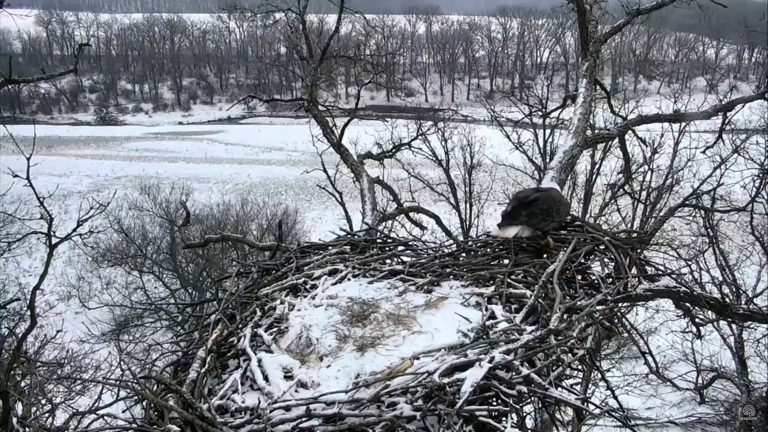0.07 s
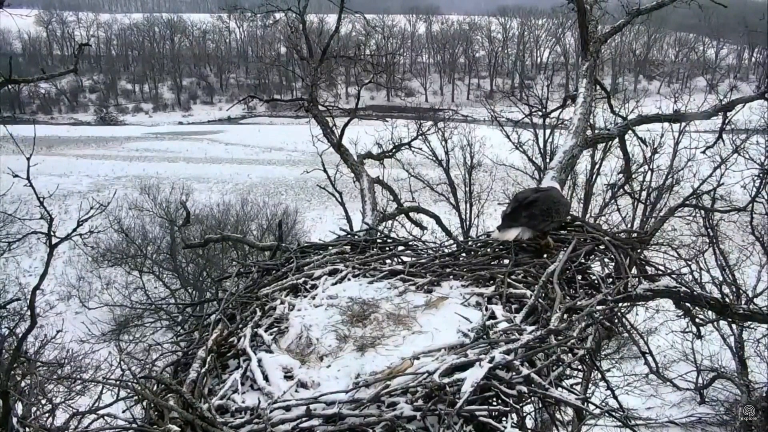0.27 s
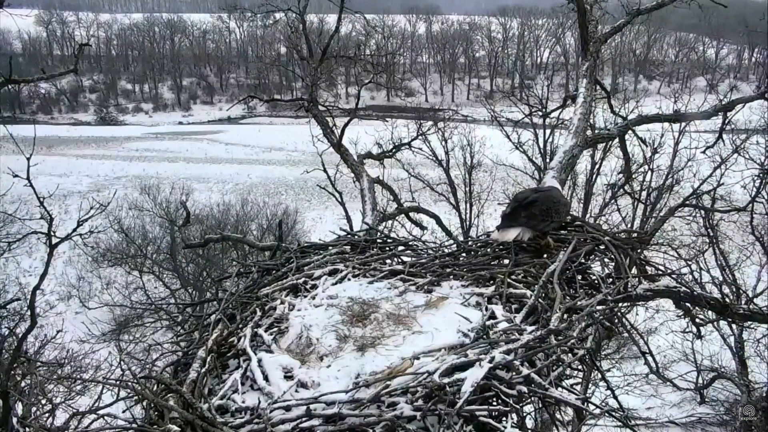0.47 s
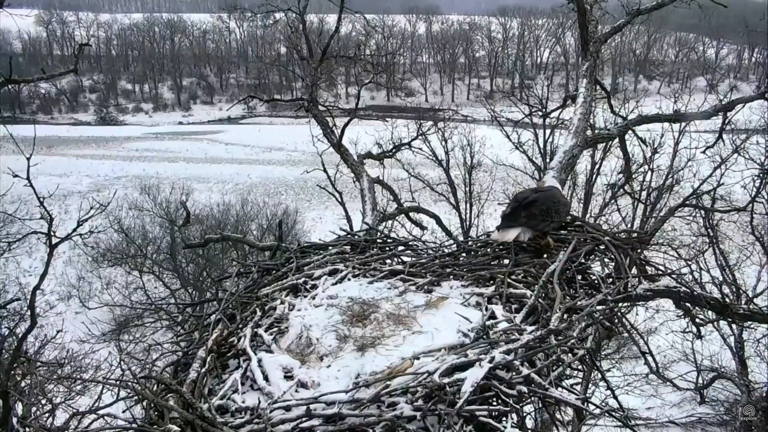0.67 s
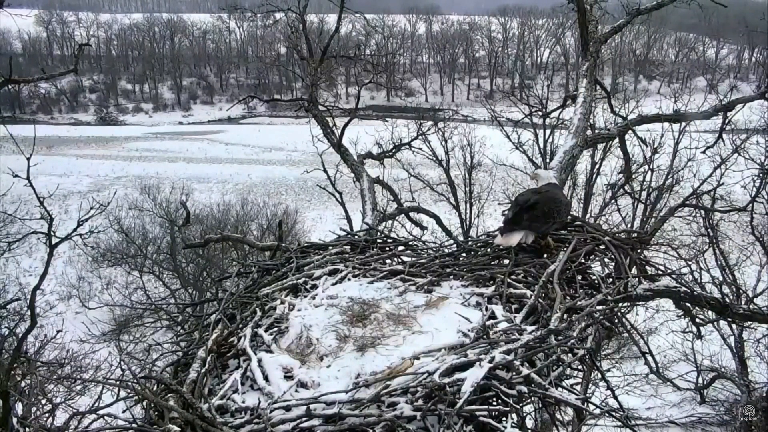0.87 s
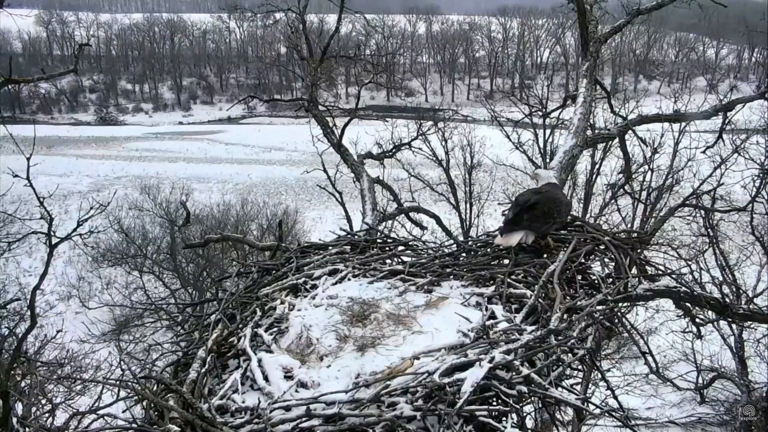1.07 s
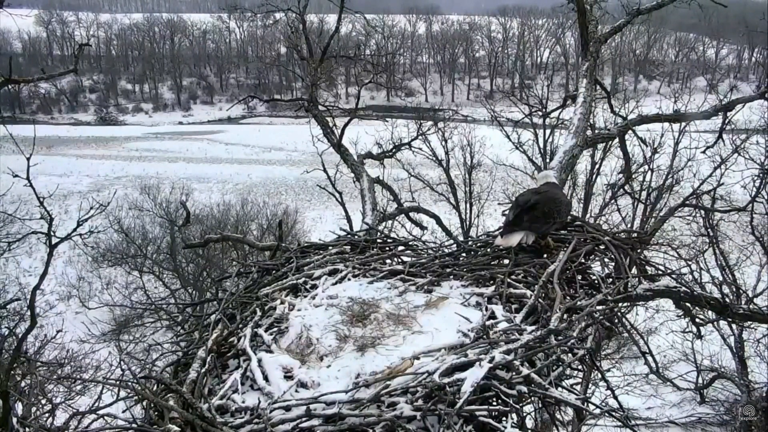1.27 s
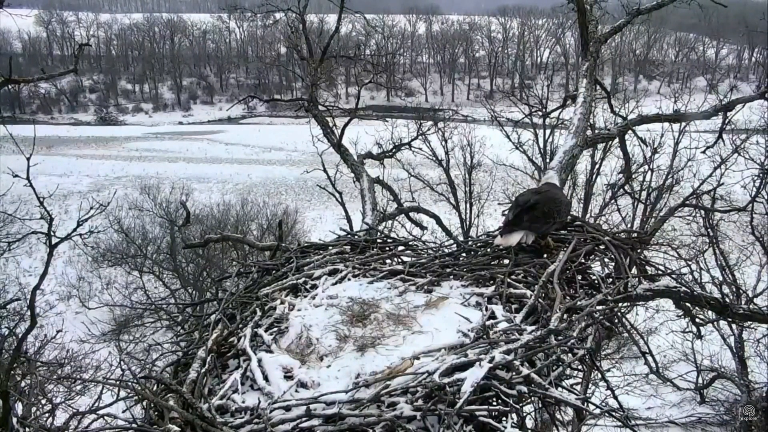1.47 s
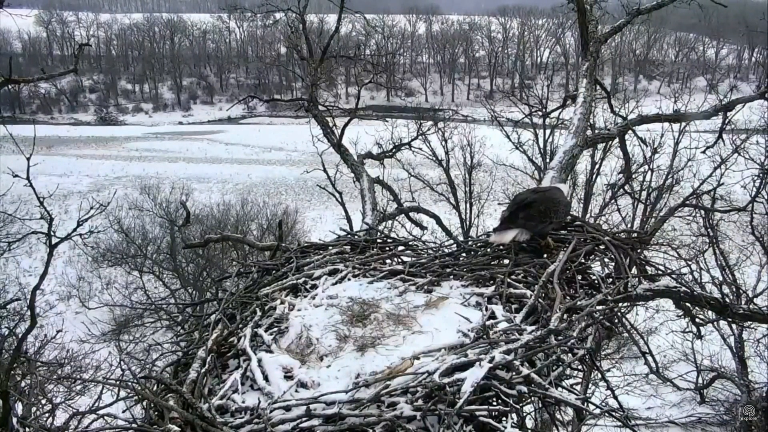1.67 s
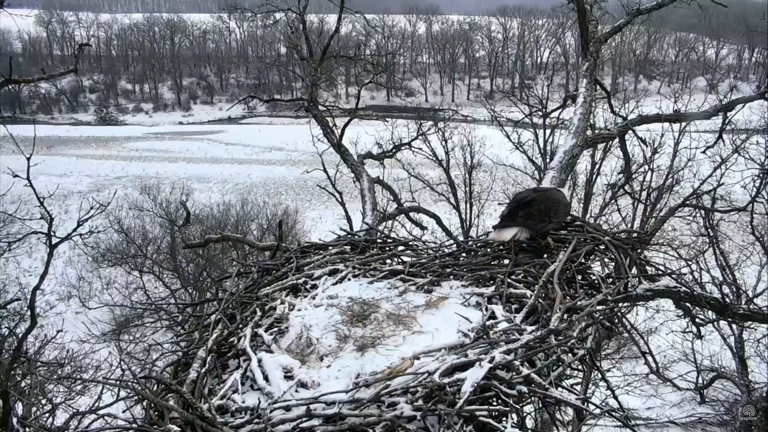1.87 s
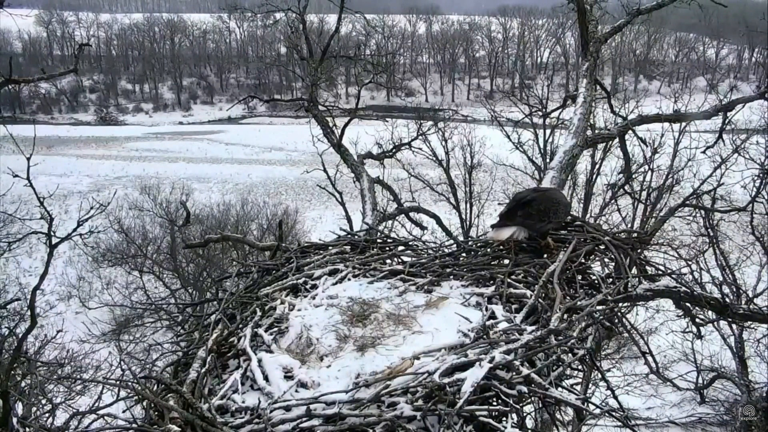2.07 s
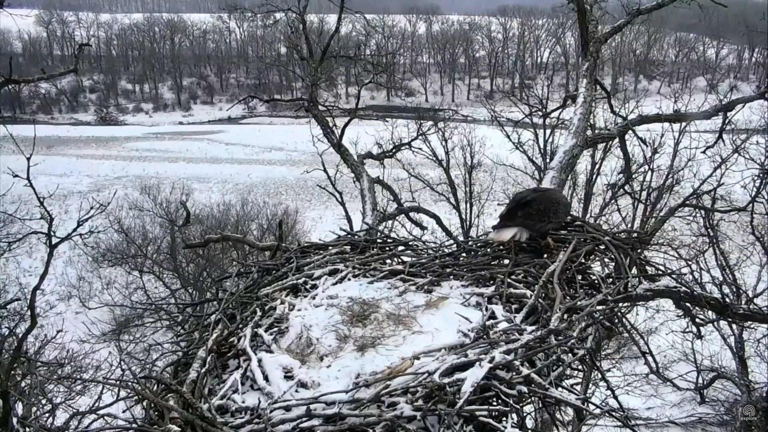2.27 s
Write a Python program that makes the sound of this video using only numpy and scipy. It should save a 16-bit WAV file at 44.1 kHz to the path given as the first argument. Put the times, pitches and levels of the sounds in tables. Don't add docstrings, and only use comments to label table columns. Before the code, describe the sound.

Low pulsing hum and airy hiss come first, then a far crow caws three times in quick succession, the last weaker, with dull valley echoes, faint traffic moans and a tiny twig tick near the end.

```python
import sys
import numpy as np
from scipy import signal
from scipy.fft import rfft, irfft
from scipy.io import wavfile
from scipy.ndimage import uniform_filter1d

SR = 44100
rng = np.random.default_rng(int(sys.argv[2]) if len(sys.argv) > 2 else 0)


def boost_factor(decibels):
    exponent = np.asarray(decibels, float) / 20
    return 10 ** exponent


def master_out(mix):
    frames = np.transpose(np.atleast_2d(mix))
    ceiling = np.clip(frames, -1, 1)
    pcm = np.round(ceiling * 32767).astype(np.int16)
    wavfile.write(sys.argv[1], SR, pcm)


N = 102929


def evened(x):
    return x / np.sqrt(np.mean(x ** 2) + 1e-20)


def read(points, hz):
    f, value = np.transpose(points)
    return np.interp(np.log(hz + 1), np.log(f + 1), value)


def drift(n, top_hz):
    settle = 9000
    lowpass = signal.butter(2, top_hz, fs=SR, output="sos")
    return evened(signal.sosfilt(lowpass, rng.standard_normal(n + settle))[settle:])


def arch(u, rise, fall, rise_power, fall_power):
    before = (abs(u) / rise) ** rise_power
    after = (abs(u) / fall) ** fall_power
    return np.exp(-np.where(u < 0, before, after))


def resonate(x, hz, width_hz):
    turn = np.exp(2j * np.pi * hz * np.arange(len(x)) / SR)
    r = np.exp(-np.pi * width_hz / SR)
    return 2 * (turn * signal.lfilter([1 - r], [1, -r], x / turn)).real


# (frequency [Hz], density [dB per Hz])
WASH_SPECTRUM = [(140, -7), (260, -11), (560, -15), (1100, -19), (2500, -27.5), (5000, -34), (9000, -36.5),
                 (15300, -39)]
WASH_DB, PATCH_DB, LOW_CUT_HZ = -58.5, 0.5, 69
RUMBLE_HZ, RUMBLE_WIDTH_HZ, RUMBLE_DB, RUMBLE_FADE_DB_PER_S = 57.2, 71, -58.5, -2


def air():
    frames, hz = N // 256 + 5, np.fft.rfftfreq(1024, 1 / SR)
    real, imag, patches = rng.standard_normal((frames, 513, 3)).T
    patches = evened(uniform_filter1d(uniform_filter1d(patches, 10, 0), 10, 1))
    z = (real + 1j * imag) * boost_factor(read(WASH_SPECTRUM, hz)[:, None] + PATCH_DB * patches)
    wash = signal.istft(z, nperseg=1024, noverlap=768)[1][:N]
    low_cut = signal.butter(4, LOW_CUT_HZ, "high", fs=SR, output="sos")
    wash = evened(signal.sosfilt(low_cut, wash))
    rumble = resonate(rng.standard_normal(N), RUMBLE_HZ, RUMBLE_WIDTH_HZ)
    rumble = evened(resonate(rumble, RUMBLE_HZ, RUMBLE_WIDTH_HZ))
    rumble_db = RUMBLE_DB + RUMBLE_FADE_DB_PER_S * np.arange(N) / SR
    return boost_factor(WASH_DB) * wash + boost_factor(rumble_db) * rumble


IN_STEP_S = 0.042


def carried(curve):
    s, hz, db = np.transpose(curve)
    t = np.arange(N) / SR
    turns = np.cumsum(np.interp(t, s, hz)) / SR - hz[0] * IN_STEP_S
    return np.sqrt(2) * boost_factor(np.interp(t, s, db)) * np.cos(2 * np.pi * turns)


# (middle [s], length [s], pitch [Hz], waver [Hz], level [dB])
MOANS = [
    (1.03, 0.21, 177.3, 1.2, -63),
    (1.53, .13, 170, 2.5, -64.5),
    (.95, 0.3, 301, 1.3, -68),
    (1.402, 0.14, 300, 1.52, -63.5),
    (2.26, 0.099, 129, 4, -57.5),
]


def moans():
    t, out = np.arange(N) / SR, np.zeros(N)
    for mid, length, hz, waver_hz, db in MOANS:
        tone = np.cos(2 * np.pi * np.cumsum(hz + waver_hz * drift(N, 7.5)) / SR)
        level = boost_factor(db + 2 * drift(N, 6.8)) * arch(t - mid, length, length, 2, 2.6)
        out += np.sqrt(2) * level * tone
    return out


# (middle [s], length [s], centre [Hz], width [Hz], level [dB])
GUSTS = [
    (1.535, 0.35, 512, 27, -67),
    (0.4, 0.36, 508, 30, -71),
    (1.07, .1, 284, 190, -63),
    (2.27, .03, 840, 270, -65),
    (0.793, 0.091, 200, 80, -64.5),
    (1.06, .5, 37, 29, -66.5),
]


def gusts():
    t, out = np.arange(N) / SR, np.zeros(N)
    for mid, length, hz, width_hz, db in GUSTS:
        fuzz = resonate(rng.standard_normal(N), hz, width_hz)
        fuzz = evened(resonate(fuzz, hz, width_hz))
        out += boost_factor(db) * arch(t - mid, length, length, 5.6, 1.17) * fuzz
    return out


# (time [s], pitch [Hz], level [dB])
DRONE = [(0, 95.83, -47.7), (.6, 95.83, -47.2), (.8, 95.83, -48), (1.0, 95.83, -47), (1.2, 95.83, -49),
         (1.45, 95.83, -48), (1.6, 95.83, -46), (1.85, 95.83, -48), (2.33, 95.83, -47)]
# (time [s], pitch [Hz], level [dB])
MOTOR = [(0, 117.9, -50), (.33, 118.5, -49.5), (.45, 117.7, -52.5), (.8, 118.8, -54), (1.05, 117.2, -64),
         (1.45, 118.4, -56.5), (1.85, 117.7, -71), (2.0, 117, -56.5), (2.33, 118, -60)]
# (time [s], pitch [Hz], level [dB])
WHINE = [(0, 235, -70.5), (.25, 237.5, -63.5), (.62, 237, -73), (1.0, 236, -65), (1.25, 235, -73.5),
         (1.6, 234, -68), (1.85, 234.3, -58.5), (2.15, 234, -59), (2.33, 233.3, -64.5)]


def machinery():
    return carried(DRONE) + carried(MOTOR) + carried(WHINE) + moans() + gusts()


# (time [s], level [dB])
TICKS = [
    (2.0463, -59.5),
]
# (frequency [Hz], level [dB], t60 [s])
TWIG = [(4370, 3, 0.0054), (7686, -0.5, 0.0079), (11000, -5, .005)]


def twig():
    t, hits, ring = np.arange(900) / SR, np.zeros(N), 0
    for s, db in TICKS:
        hits[round(s * SR)] = boost_factor(db)
    for hz, db, t60 in TWIG:
        ring = ring + boost_factor(db - 60 * t / t60) * np.sin(2 * np.pi * hz * t)
    return signal.oaconvolve(hits, ring)[:N]


# (frequency [Hz], t60 [s])
VALLEY_T60 = [(700, 3.1), (1500, 2.2), (2500, .9), (4000, 0.28), (8000, 0.38)]
# (frequency [Hz], level [dB])
VALLEY_TONE = [(700, -3), (1500, -8), (2500, -18), (4000, -25), (8000, -15)]
TAIL_DB, TAIL_RISE_S = -1.5, 0.037


def valley_tail():
    taps = np.zeros(2 * SR)
    at = np.arange(100, 2 * SR - 20, 20)
    taps[at + rng.integers(0, 20, len(at))] = rng.choice([-1., 1.], len(at))
    hz, t, z = signal.stft(taps, SR, nperseg=256)
    t60 = np.maximum(read(VALLEY_T60, hz), 0.05)[:, None]
    z = z * boost_factor(-60 * t / t60) * (1 - np.exp(-t / TAIL_RISE_S))
    z = z / np.linalg.norm(z, axis=1)[:, None].clip(1e-9)
    tail = signal.istft(z * boost_factor(read(VALLEY_TONE, hz))[:, None], SR, nperseg=256)[1]
    call_band = abs(np.fft.rfft(tail[:SR])[1200:1700])
    return tail * boost_factor(TAIL_DB) / call_band.std() / 2


# (delay [s], level [dB])
ECHOES = [
    (.006, -6.5),
    (0.011, -29),
    (.024, -3.5),
    (.082, -11),
    (.118, -12),
    (0.211, -8.5),
]
ECHO_TOP_HZ = 2040
TRUNK_S, TRUNK_DB, TRUNK_LOW_HZ = 0.043, -4, 3950


def valley(x):
    tail = valley_tail()
    echoes = np.zeros(SR)
    for s, db in ECHOES:
        echoes[round(s * SR)] = boost_factor(db)
    dull = signal.sosfilt(signal.butter(2, ECHO_TOP_HZ, fs=SR, output="sos"), echoes)
    top = signal.sosfilt(signal.butter(6, TRUNK_LOW_HZ, "high", fs=SR, output="sos"), x)
    trunk = boost_factor(TRUNK_DB) * np.roll(top, round(TRUNK_S * SR))
    return trunk + signal.fftconvolve(x, tail)[:N] + signal.fftconvolve(x, dull)[:N]


# (frequency [Hz], level [dB])
THROAT = [(820, -13), (1200, 0), (1440, 2.5), (1640, -1.4), (1950, -9), (2450, -9.5), (2900, -20),
          (3290, -5)]
# (frequency [Hz], level [dB])
TOP = [(4000, -15.5), (5800, -22)]
RISE_S, FALL_S, SAG, PITCH_POWER = 0.042, 0.068, 0.35, 2.8
SWELL_S, FADE_S, EDGE_POWER, TIRE_DB_PER_S = 0.039, 0.098, 5, -35
BRIGHT_RISE_S, BRIGHT_FALL_S, BRIGHT_DB = 0.031, 0.037, 3
JITTER, SHIMMER_DB, RASP_HZ, RASP = 0.006, 1.8, 75, 0.6
HUSK_DB, HUSK_LEAD_S = -15, 0.06


def caw(top_s, top_hz, effort_db, stretch):
    u = np.arange(N) / SR - top_s
    pitch = 1 - SAG + SAG * arch(u, RISE_S, FALL_S * stretch, PITCH_POWER, PITCH_POWER)
    hz = top_hz * pitch * (1 + JITTER * drift(N, 120))
    phase = 2 * np.pi * np.cumsum(hz) / SR
    slack = 1 - arch(u, BRIGHT_RISE_S, BRIGHT_FALL_S * stretch, 2, 1.5)
    flutter_hz = RASP_HZ * (1 + 0.3003 * drift(N, 24.9))
    rasp = RASP * (0.5 + slack) * np.cos(2 * np.pi * np.cumsum(flutter_hz) / SR)

    tone = np.zeros(N)
    for k in range(1, 9):
        dulling_db = BRIGHT_DB * min(max(k - 2, 0), 3) * slack
        level_db = read(THROAT + TOP, k * hz) - dulling_db + SHIMMER_DB * drift(N, 74)
        tone += boost_factor(level_db) * (1 + rasp * min(1, 6 / k ** 2)) * np.cos(k * phase)

    throat = [(400, -37)] + THROAT + TOP + [(9000, -47)]
    colour = boost_factor(read(throat, np.fft.rfftfreq(N, 1 / SR)))
    husk = evened(irfft(rfft(rng.standard_normal(N)) * colour, N))
    husk = boost_factor(HUSK_DB) * (1 + rasp) * arch(u, HUSK_LEAD_S, FADE_S * stretch, 4, 4) * husk

    loud = arch(u, SWELL_S, FADE_S * stretch, EDGE_POWER, EDGE_POWER)
    level = boost_factor(effort_db + TIRE_DB_PER_S * np.clip(u, -0.1, 0.2))
    return np.sqrt(2) * level * (loud * tone + husk)


# (time of highest pitch [s], highest pitch [Hz], effort [dB], fall stretch [ratio])
CAWS = [
    (1.042, 823, -58.5, 1),
    (1.362, 822.5, -59, 0.99),
    (1.723, 828.6, -60, .97),
]


def scene():
    crow = sum(caw(*row) for row in CAWS)
    return (crow + valley(crow) + machinery() + air() + twig())[None]


def band_limit(x):
    return signal.sosfilt(signal.butter(12, 16320, fs=SR, output="sos"), x)


def record(dry):
    edge = signal.firwin(801, 15480, window=("kaiser", 7), fs=SR)
    mix = signal.oaconvolve(dry, edge[None], "same")
    return band_limit(mix)


dry = scene()
out = record(dry)
master_out(out)
```